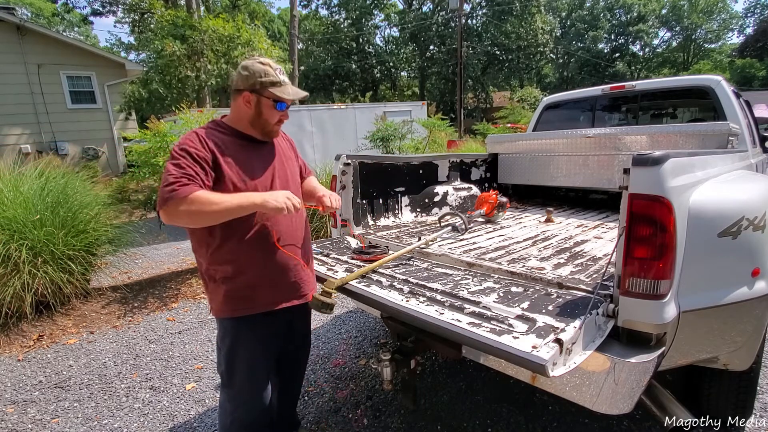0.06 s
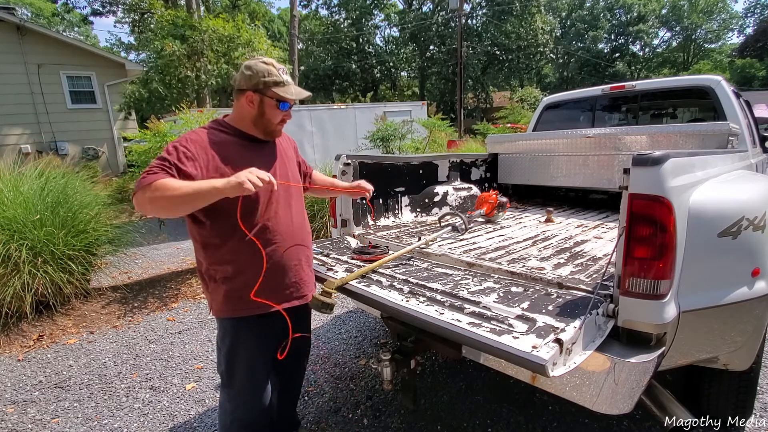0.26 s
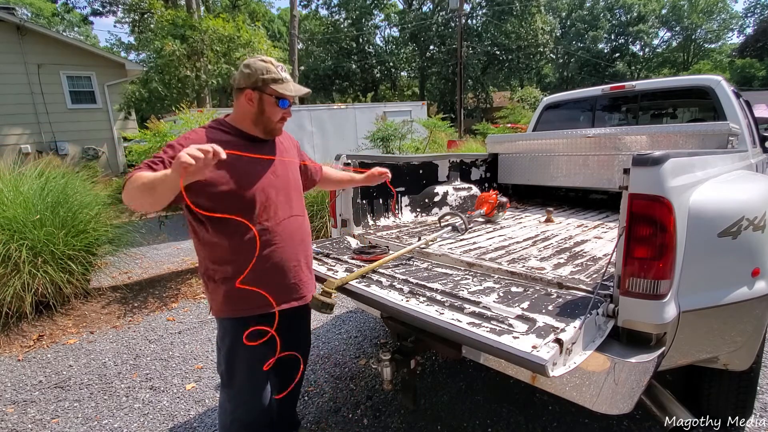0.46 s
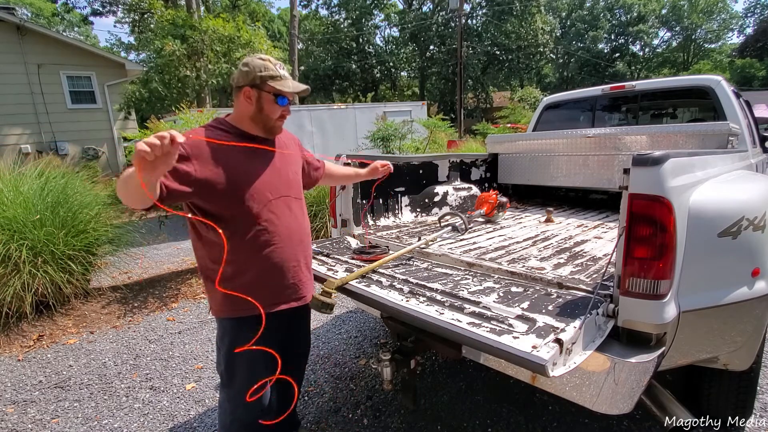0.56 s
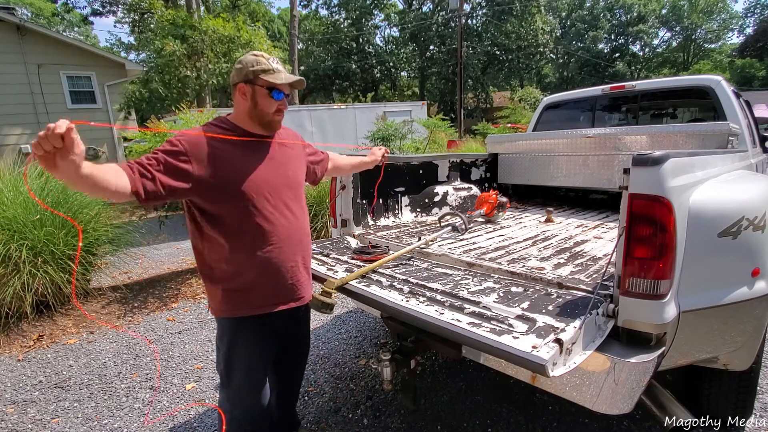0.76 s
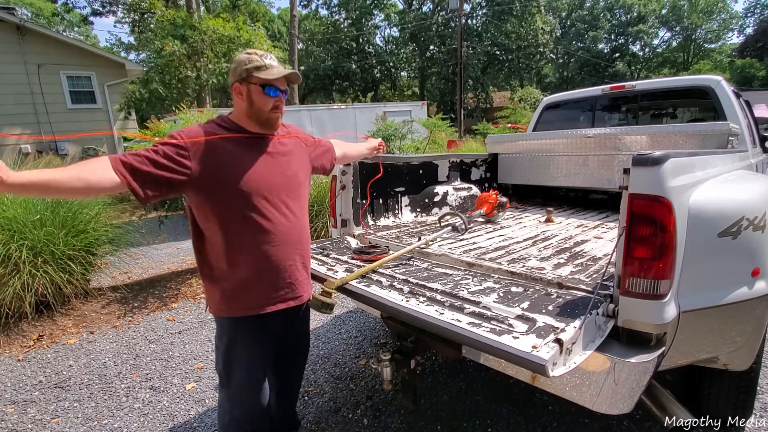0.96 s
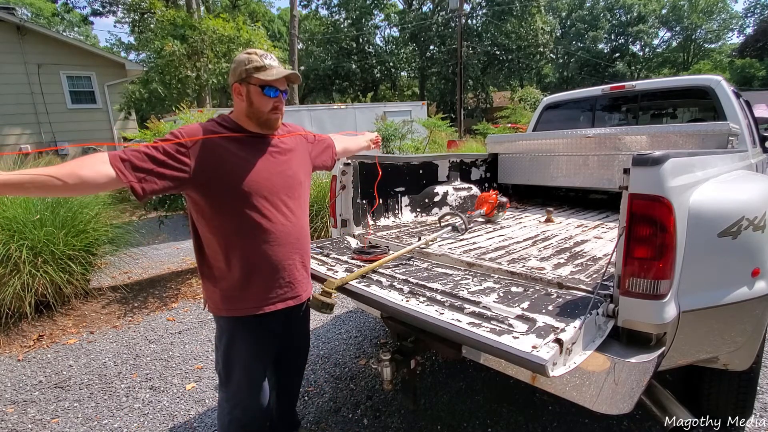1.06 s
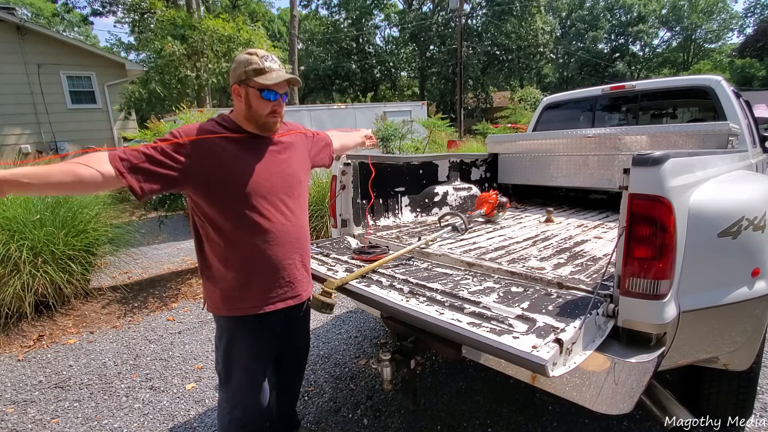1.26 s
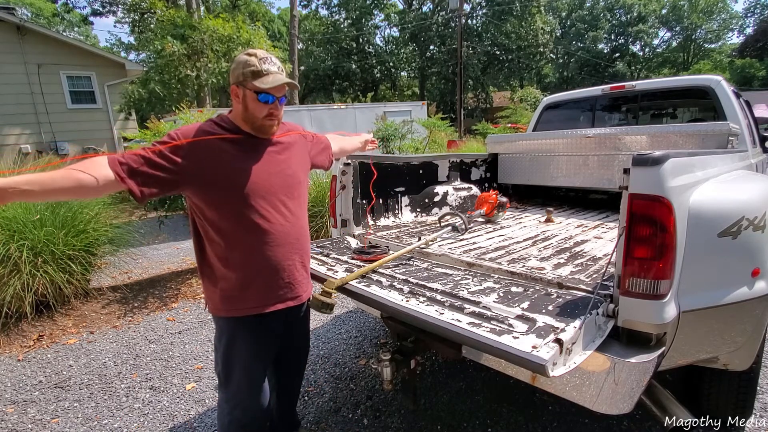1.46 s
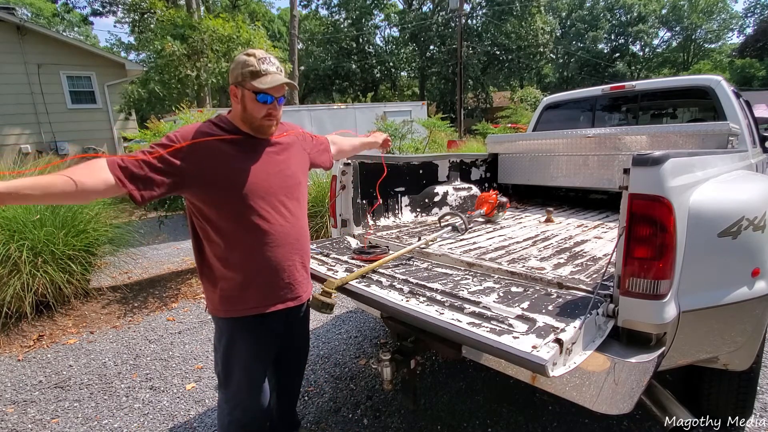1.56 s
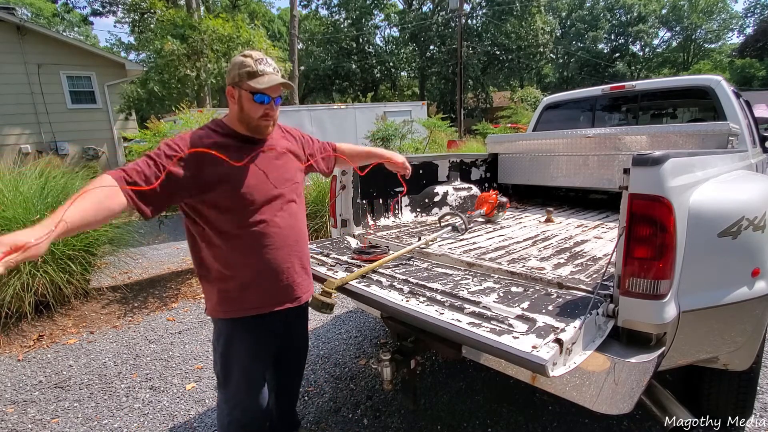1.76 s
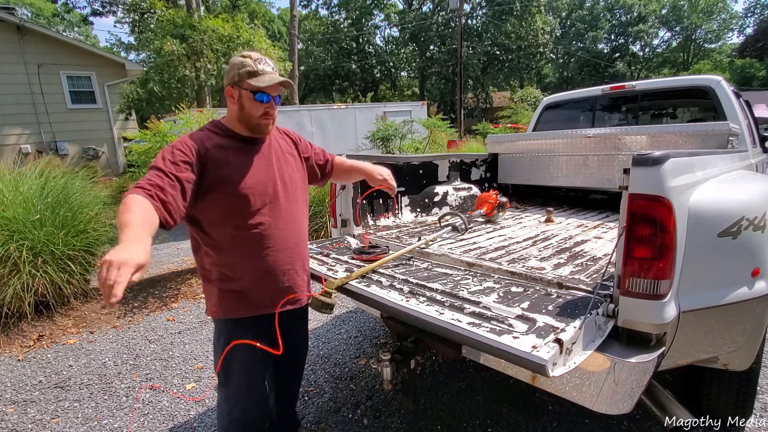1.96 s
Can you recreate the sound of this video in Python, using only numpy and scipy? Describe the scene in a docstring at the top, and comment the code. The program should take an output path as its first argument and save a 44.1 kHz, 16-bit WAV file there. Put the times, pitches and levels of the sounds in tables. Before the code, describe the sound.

Plastic trimmer line pulled off a coil by hand, close and dry outdoors. Faint rustles begin, then clacking slaps at 0.24 s and the loudest hollow snap at 0.36 s. Scraping, ringing catches and smaller taps continue until a brief rising squeaky zip near 0.96 s. Afterwards it is mostly quiet: sharp ticks and a soft swish at 1.33 s toward the left, faint handling around 1.7-1.9 s, low wind rumble on the right, steady faint hiss.

```python
"""Plastic trimmer line is pulled off a coil by hand, heard close up, outdoors beside a pickup truck.
Loops slap as chatter bursts that knock hollow modes; sliding is friction with small ringing catches.
The line zips out as a rasp with a climbing squeak; held taut, it ticks and swishes on the left as noise.
Wind rumbles and thumps on the microphone as low noise and short sines, over a faint, steady far hiss."""
import sys
import numpy as np
from scipy import signal
from scipy.fft import rfft, irfft
from scipy.io import wavfile
from scipy.ndimage import uniform_filter1d

SR = 44100
rng = np.random.default_rng(int(sys.argv[2]) if len(sys.argv) > 2 else 0)


def inscribe(sig):
    """Save sig as 16-bit PCM at rate SR to the path in sys.argv[1].

    A 1-D sig is mono; a 2-D sig holds one channel per row.
    Samples are clipped to [-1, 1] before scaling.
    """
    pcm = np.round(np.clip(np.atleast_2d(sig).T, -1, 1) * 32767)
    wavfile.write(sys.argv[1], SR, pcm.astype(np.int16))


N = 88200
T = np.arange(N) / SR
SIDES = np.array([[1], [-1]])  # left, right

# stereo width of loops and zip: (frequency [Hz], side level against middle [dB])
HAND_WIDTH = [(200, -17.5), (800, -7.5), (3000, -3), (7000, -2), (14000, 1)]
# their left-right balance: (frequency [Hz], left minus right [dB])
HAND_LEAN = [(1000, -0.5), (6000, 0.5), (12000, 6.5)]

ZIP_S = 0.9625  # the line has run out; the zip peaks and the random catches end


def from_db(db):
    """Decibels to gain."""
    return 10 ** (np.asarray(db) / 20)


def level(rows):
    """Gain over time from (time [s], level [dB]) points."""
    return from_db(np.interp(T, *np.transpose(rows)))


def colour(x, points, even=False):
    """Minimum-phase filter through (frequency [Hz], dB) points; even keeps the power of white noise."""
    size = 2 ** 17
    hz, db = np.transpose(points)
    bins_hz = np.arange(size // 2 + 1) * SR / size
    gain = from_db(np.interp(np.log(bins_hz + 1), np.log(hz), db))
    if even:
        gain = gain / np.sqrt(np.mean(gain ** 2))
    # folding the cepstrum forward in time makes the filter causal
    fold = irfft(np.log(gain))
    fold[1:size // 2] *= 2
    fold[size // 2 + 1:] = 0
    response = np.exp(rfft(fold))
    return irfft(rfft(x, size) * response)[..., :N]


def stereo(pair, width):
    """Two unrelated signals as middle and side."""
    return pair[0] + SIDES * colour(pair[1], width)


def lean(pair, points):
    """Tilt towards the left channel, by frequency; half the difference goes to each side."""
    left = colour(pair[0], [(hz, db / 2) for hz, db in points])
    right = colour(pair[1], [(hz, -db / 2) for hz, db in points])
    return np.array([left, right])


def friction(rough):
    """Two streams of tiny catches of uneven size, level evened over about 3 ms."""
    x = rng.standard_normal((2, N)) * np.exp(rough * rng.standard_normal(N))
    return x / np.sqrt(uniform_filter1d(x ** 2, size=130) + 1e-12)


def touch(start, length):
    """Envelope of one contact: linear rise centred on its start, hold, exponential fall."""
    rise_s, fall_s = 0.00039, 0.00043
    rise = np.clip((T - start) / rise_s + 0.5, 0, 1)
    fall = np.exp(-np.maximum(T - start - length, 0) / fall_s)
    return rise * fall


def tail(pair, db, t60):
    """Dense noise ring after each sound, building over a few milliseconds and dying 60 dB in t60 [s]."""
    response = rng.standard_normal((2, N)) * from_db(-60 * T / t60) * (1 - np.exp(-T * 400))
    response /= np.sqrt(np.sum(response ** 2, axis=1, keepdims=True))
    return from_db(db) * signal.fftconvolve(pair, response, axes=1)[:, :N]


def resonance(x, hz, t60):
    """One two-pole mode with gain 1 at its top, dying 60 dB in t60 [s]."""
    r = np.exp(-np.log(1000) / (t60 * SR))
    feed = np.array([1, 0, -1]) * (1 - r * r) / 2
    feedback = [1, -2 * r * np.cos(2 * np.pi * hz / SR), r * r]
    return signal.lfilter(feed, feedback, x)


def tone(low, mid, high):
    """Bass, middle and treble of a force joined by crossovers, then given the colour of the contact."""
    bass_edge_hz, treble_edge_hz = 667, 9700
    # colour of the contact: (frequency [Hz], relative level [dB])
    contact = [(60, -16.5), (150, -10.5), (330, -3.5), (500, 2.5), (700, 2), (1250, 2.5), (2000, -1),
               (3100, -0.9), (4400, -5), (5500, -10.5), (7200, -8), (9000, -14.5), (12500, -8.5),
               (16000, -12.5)]

    def cut(x, hz, kind):
        """Second-order Butterworth run twice."""
        once = signal.butter(2, hz, kind, fs=SR, output="sos")
        return signal.sosfilt(np.tile(once, (2, 1)), x)

    lower = cut(low, bass_edge_hz, "low") + cut(mid, bass_edge_hz, "high")
    joined = cut(lower, treble_edge_hz, "low") + cut(high, treble_edge_hz, "high")
    return colour(joined, contact, even=True)


def catches(count=14):
    """Until the line has run out, kinks catch at random: clicks that ring at one of several pitches."""
    rate_per_s, size_db, spread_db = 170, 16.5, 4
    lowest_hz, highest_hz = 491, 5000
    ring_cycles, ring_db = 18, 12.5  # cycles to fall 60 dB; gain of the rings beside the clicks
    sizes = from_db(size_db + spread_db * np.clip(rng.standard_normal(N), -2, 2))
    happens = rng.random(N) < rate_per_s / SR * (T < ZIP_S)
    clicks = happens * rng.choice([-1, 1], (2, N)) * sizes
    dealt = rng.integers(0, count, N)
    pitches = np.geomspace(lowest_hz, highest_hz, count)
    # the tiny offset keeps the filters from stalling on vanishing numbers
    rings = sum(resonance(clicks * (dealt == k) + 1e-18, hz, ring_cycles / hz)
                for k, hz in enumerate(pitches))
    return clicks + from_db(ring_db) * rings


def sliding():
    """Juddering friction, sprinkled with single catches, follows the pull of line through the hand."""
    rough, rub_db, judder_db = 0.79, -2.5, 0.5
    bass_db, treble_db = 6, -0.5
    # strength of the slide: (time [s], level [dB])
    pull = [(0, -71), (.04, -55), (.15, -53.5), (.22, -47.5), (.29, -44.5), (.44, -41), (.5, -45),
            (.55, -61), (.62, -42), (.69, -54), (.79, -44.5), (.86, -51), (.94, -47), (1.01, -54),
            (1.11, -53.5), (1.2, -67.5), (1.72, -62), (1.84, -55), (1.88, -58), (1.91, -86.5)]
    judder = np.interp(T, np.linspace(0, T[-1], num=300), rng.standard_normal(300))
    smooth_rub = friction(rough) * from_db(rub_db + judder_db * judder)
    rub = (smooth_rub + catches()) * level(pull)
    return tone(rub * from_db(bass_db), rub, rub * from_db(treble_db))


def loops():
    """Each slap is a burst of chatter and one knock on the hollow modes; sliding stirs them more gently."""
    # loops slap and scrape: (time [s], hold [s], level [dB], bass over that level [dB])
    slaps = [(0.031, 0.0023, -47, -12), (0.078, .0015, -41.5, 8.5), (0.037, .006, -41, 0.5),
             (.056, 0.0042, -39, 3), (0.112, 0.0098, -48, 6), (0.2021, 0.004, -35, 11.5),
             (0.218, 0.0042, -45.5, 21.5), (0.2357, 0.003, -22.5, -2), (0.2406, 0.0036, -21.5, 4),
             (.2455, 0.0049, -20.5, 2.5), (.252, 0.0059, -33, 3), (0.258, 0.0029, -24, -6),
             (0.263, 0.0078, -33, 12), (0.3555, 0.0015, -17, -18), (0.3576, 0.00302, -7, -8),
             (0.3618, .002, -21.5, 1), (0.369, 0.0065, -29, 10), (.384, 0.0013, -26.5, -8),
             (0.405, 0.0016, -28.5, 1), (0.412, 0.0015, -32.5, 0), (.428, 0.0072, -39.5, 11),
             (0.456, 0.0024, -40, 6), (0.504, 0.0047, -39.5, -6), (0.5602, 0.0025, -33.5, -7),
             (.564, 0.0016, -23.5, -13), (0.572, 0.013, -36.5, 6), (0.59, 0.0052, -33.5, 6.5),
             (0.6, 0.017, -36.5, 4), (0.6065, 0.0053, -30.5, 4), (0.639, 0.0045, -33, 4),
             (0.649, 0.0069, -41, 0), (.679, .004, -43, 9), (0.709, 0.008, -39, 8), (0.722, 0.0049, -42, 8),
             (0.736, 0.0032, -36.5, 8.5), (0.754, 0.0068, -34, 9.5), (0.768, 0.0033, -34, 10),
             (.792, 0.0048, -38, 5), (0.8048, 0.0051, -33, 7), (0.817, .01, -44.5, 9.5),
             (0.847, 0.0025, -35.5, 9.5), (0.874, 0.011, -41, -18), (1.044, 0.0069, -42.5, -0.5),
             (1.082, 0.005, -41, -1), (1.176, 0.0019, -49.5, -9), (1.7172, 0.0034, -44, 10),
             (1.821, 0.0019, -52, 4.5), (1.84, .002, -49, 3), (1.865, 0.0018, -51.5, 1.5)]
    # hollow ring under each contact: (frequency [Hz], level before hollow_db [dB], fall by 60 dB [s])
    modes = [(213, 18, .3), (285, 7, .2), (345, 7, .25), (390, 7, .22), (500, 7, .15), (623, 8.5, .08),
             (694, 4, .25), (815, 12, .16), (1246, 3.5, .08), (1877, 2, .09), (2355, 3, .13),
             (2840, 6, .04), (3232, 1, .14), (4216, 4, .08)]
    rough, treble_db = 0.25, -3.5
    hard_db, ring_growth = -15.5, 0.39  # slaps below hard_db lose this share of the gap again in the modes
    slide_ring_db, hollow_db = -11.5, 3.5

    slide = sliding()
    envelopes, knocks = np.zeros((2, 3, N))  # rows are bass, middle, treble
    for start, length, db, bass_db in slaps:
        gains = from_db([db + bass_db, db, db + treble_db])
        envelopes += np.outer(gains, touch(start, length))
        softness = from_db(ring_growth * min(db - hard_db, 0))
        middle = int((start + length / 2) * SR)
        knocks[:, middle] += gains * np.sqrt(length * SR) * softness
    chatter = envelopes[:, None] * friction(rough)
    force = slide + tone(*chatter)
    drive = tone(*knocks) + from_db(slide_ring_db) * slide[0]
    hollow = sum(from_db(hollow_db + db) * resonance(drive, hz, t60) for hz, db, t60 in modes)
    short_tail = tail(force, -8.5, 0.053)
    long_tail = tail(force, -11, 0.6)
    return lean(hollow + stereo(force + short_tail + long_tail, HAND_WIDTH), HAND_LEAN)


def outdoors():
    """Gusts are low noise of its own on each channel, thumps are brief sines, far hiss is steady noise."""
    # rise and fall of the wind, before its lean: (time [s], level [dB])
    gusts = [(0, -54), (.1, -55), (.16, -42), (.24, -67), (.45, -58.5), (.75, -72), (.81, -47),
             (.88, -55.5), (1.03, -55), (1.12, -44), (1.28, -63), (1.36, -54.5), (1.5, -67.5), (1.6, -44),
             (1.7, -59.5), (2, -57.5)]
    # colour of the rumble: (frequency [Hz], relative level [dB])
    rumble = [(28, -21), (42, 1), (58, 3.5), (90, -8.5), (250, -26.5), (1500, -99)]
    # puffs that thump the microphone: (time [s], envelope peak before the lean [dB])
    puffs = [(.325, -37.5), (0.789, -36), (1.362, -40.5), (1.598, -37)]
    # colour of the hiss: (frequency [Hz], relative level [dB])
    air = [(100, 6.5), (200, -3.5), (400, -12), (1000, -14.5), (2200, -21), (5000, -16), (7300, -18),
           (8500, -25.5), (15000, -30.5)]
    # width of the hiss: (frequency [Hz], side level against middle [dB])
    air_width = [(150, -24), (800, 6.5), (3000, 0.5)]
    puff_hz, puff_width_s = 68, 0.01
    wind_lean_db, air_db = 9.5, -55  # the wind is this much louder on the right

    wind = colour(rng.standard_normal((2, N)), rumble, even=True) * level(gusts)
    phases = rng.uniform(0, 2 * np.pi, len(puffs))
    for (start, db), phase in zip(puffs, phases):
        bump = np.exp(-((T - start) / puff_width_s) ** 2)
        wind = wind + from_db(db) * bump * np.sin(2 * np.pi * puff_hz * (T - start) + phase)
    hiss = stereo(colour(rng.standard_normal((2, N)), air, even=True), air_width)
    return wind * from_db(-SIDES * wind_lean_db / 2) + from_db(air_db) * hiss


def taut_line():
    """Ticks are noise that starts at once and dies fast; swishes are grainy friction on the hand."""
    # sharp ticks: (time [s], level before the final halving [dB])
    ticks = [(0.076, -21.5), (1.3248, -17.5), (1.3266, -16.5), (1.473, -34)]
    # the line brushes the hand: (time [s], hold [s], level before the final halving [dB])
    swishes = [(1.203, 0.0032, -43), (1.332, 0.0041, -35.5), (1.3518, 0.0016, -32), (1.353, 0.014, -35.5),
               (1.372, 0.017, -44.5)]
    # colour of both: (frequency [Hz], relative level [dB])
    tick_colour = [(300, -13), (1500, -3.5), (2400, 0), (4000, -5), (6500, -0.5), (9000, -5.5),
                   (13000, -3.5), (15300, 1)]
    # lean to the left: (frequency [Hz], left minus right [dB])
    tick_lean = [(2000, 1.2), (6000, 5.6), (12000, 11.6)]
    decay_s, rough = 0.00038, 0.79

    snaps = sum(from_db(db) * (T >= start) * np.exp(-np.abs(T - start) / decay_s) for start, db in ticks)
    brushes = sum(from_db(db) * touch(start, length) for start, length, db in swishes)
    noise = rng.standard_normal((2, N)) * snaps + friction(rough) * brushes
    x = colour(noise, tick_colour, even=True)
    return lean(x + tail(x, -3, 0.38), tick_lean) / 2


def finger_zip():
    """A short rasp with a rising, unsteady squeak swells and stops as the line runs out of the fingers."""
    # colour of the rasp: (frequency [Hz], relative level [dB])
    rasp_colour = [(300, -25), (3000, -1), (9000, -10)]
    zip_db, rise_s, fall_s = -33, 0.0065, 0.0022
    top_hz, squeak_db = 3300, 2.5  # pitch reached, before the waver; level over the swell
    octaves_per_s, waver_share = 54, 0.053

    swell = from_db(zip_db) * np.exp(np.minimum((T - ZIP_S) / rise_s, (ZIP_S - T) / fall_s))
    waver = uniform_filter1d(rng.standard_normal((2, N)), size=30)
    # the squeak climbs its last octave as the line speeds up
    climb = 2 ** np.clip(octaves_per_s * (T - ZIP_S), -1, 0)
    pitch = top_hz * climb * (1 + waver_share * waver / waver.std())
    squeak = from_db(squeak_db) * np.sin(2 * np.pi * np.cumsum(pitch, axis=1) / SR)
    rasp = colour(friction(rough=0.75) * swell, rasp_colour, even=True)
    x = rasp + squeak * swell
    return lean(stereo(x + tail(x, -8, 0.17), HAND_WIDTH), HAND_LEAN)


def scene():
    """The line in the hand and the open air around it."""
    return loops() + outdoors() + taut_line() + finger_zip()


def record(dry):
    """The loudest peaks are rounded by a soft limit and the top is cut."""
    peak, stop_hz = 0.88, 16600  # ceiling of the rounding; 70 dB down from stop_hz upwards
    rounded = peak * np.tanh(dry / peak)
    return signal.sosfilt(signal.cheby2(16, 70, stop_hz, fs=SR, output="sos"), rounded)


dry = scene()
out = record(dry)
inscribe(out)
```